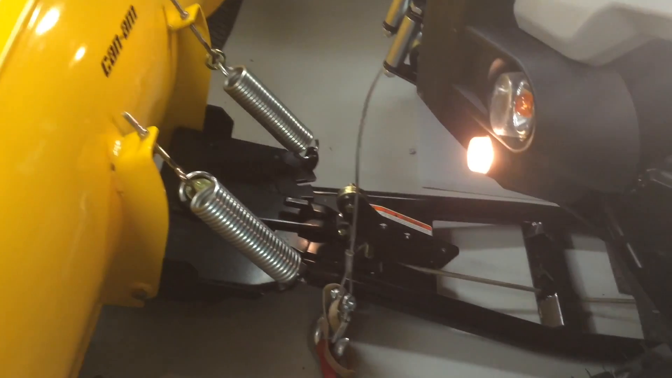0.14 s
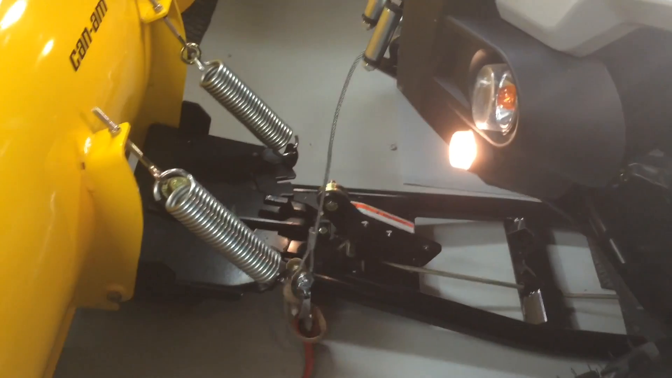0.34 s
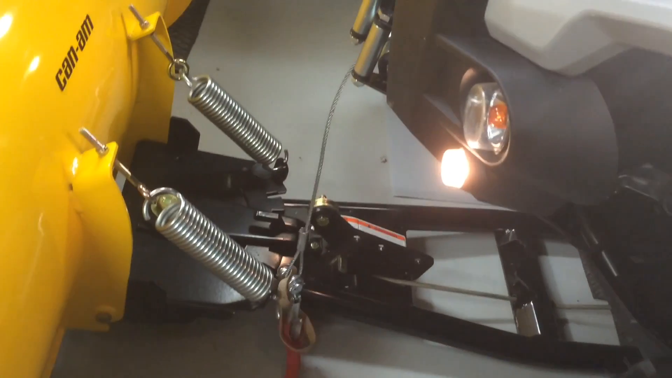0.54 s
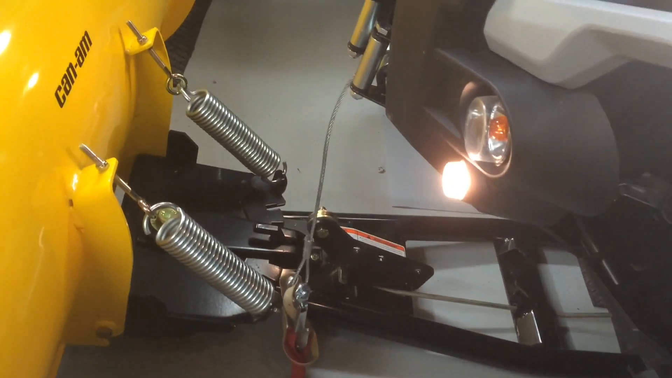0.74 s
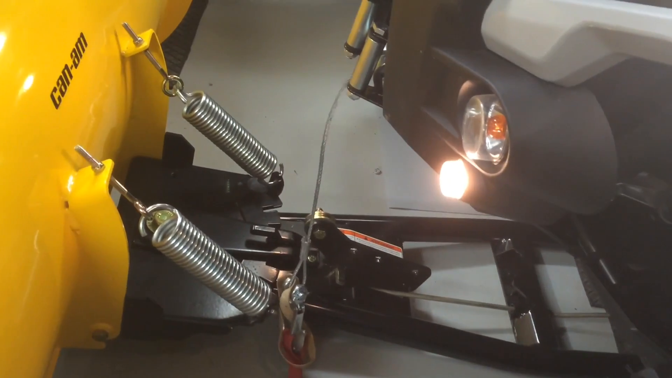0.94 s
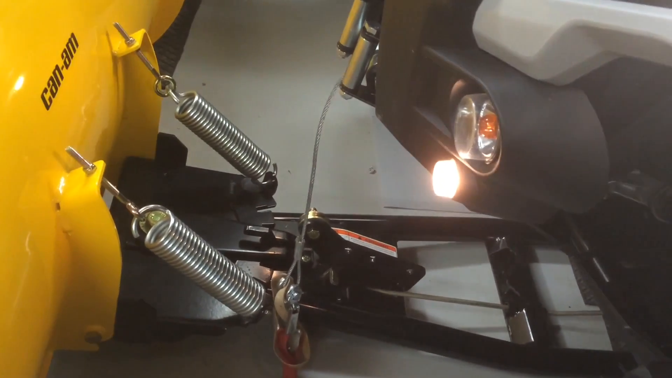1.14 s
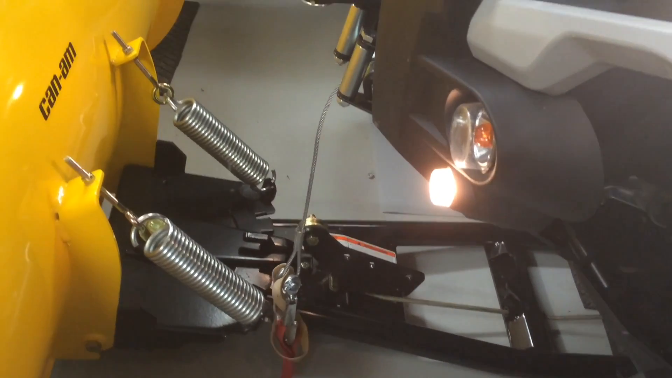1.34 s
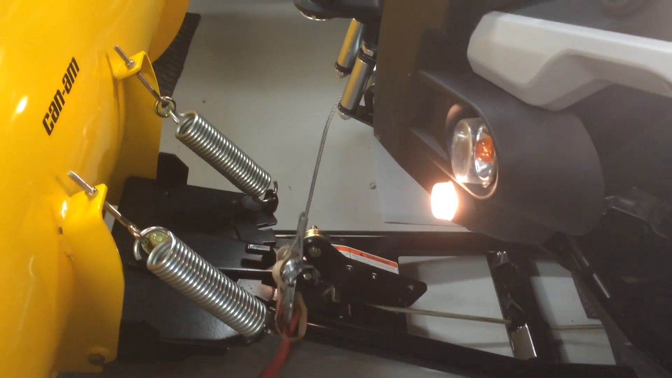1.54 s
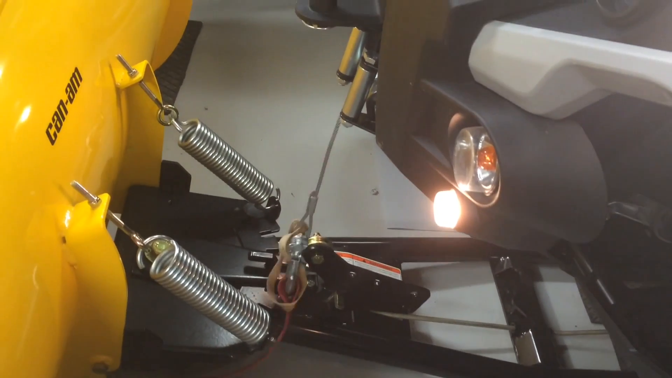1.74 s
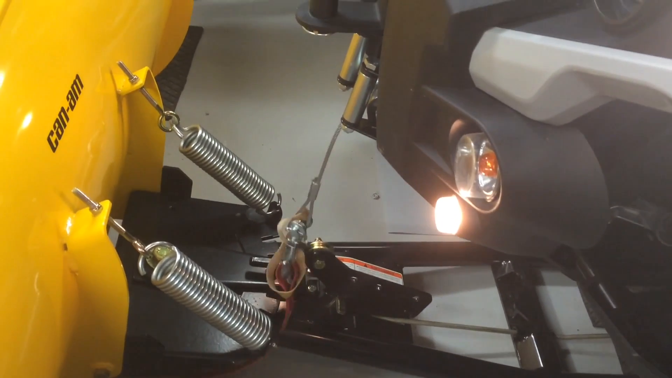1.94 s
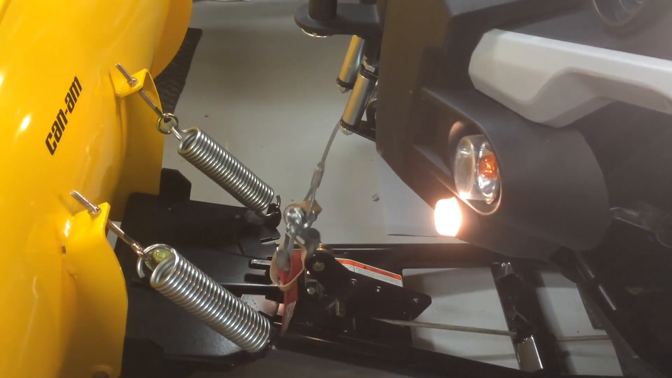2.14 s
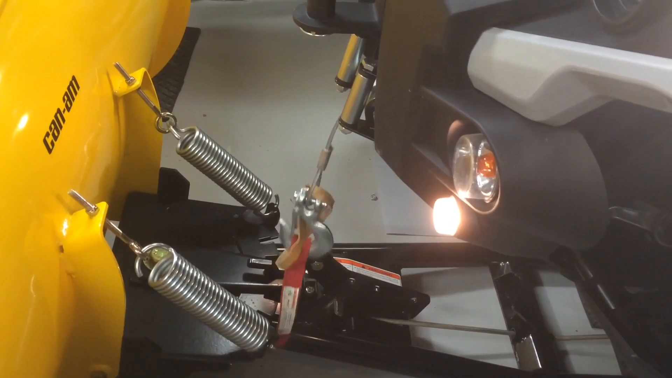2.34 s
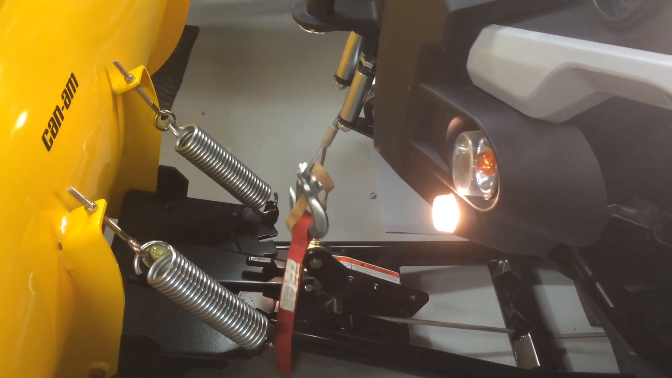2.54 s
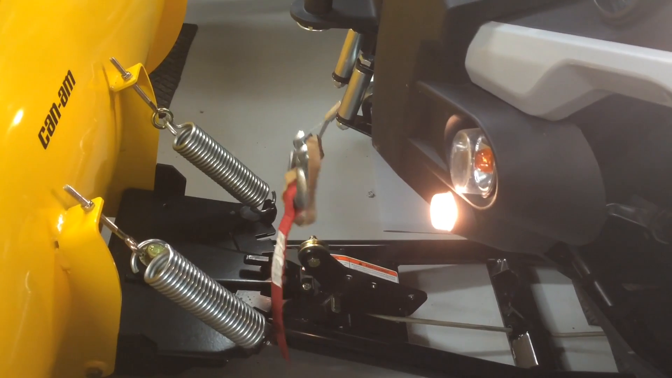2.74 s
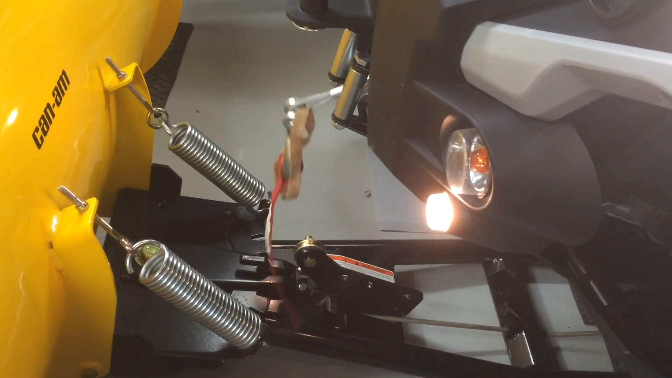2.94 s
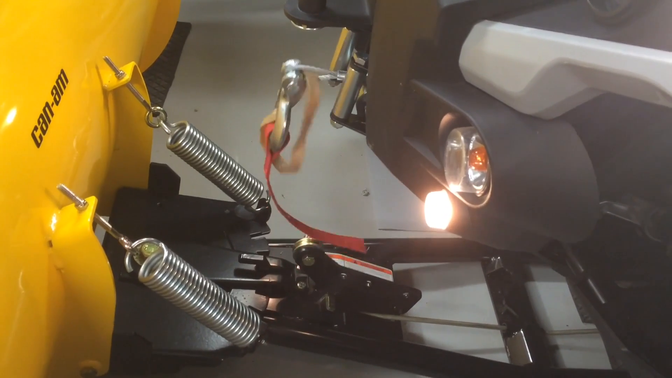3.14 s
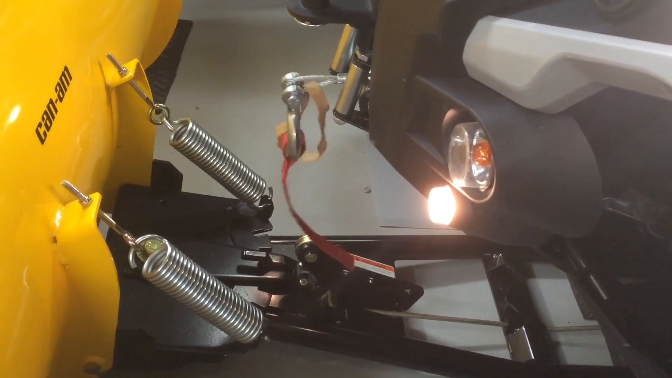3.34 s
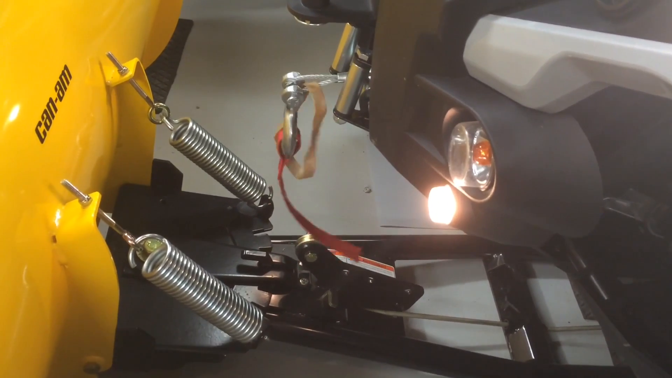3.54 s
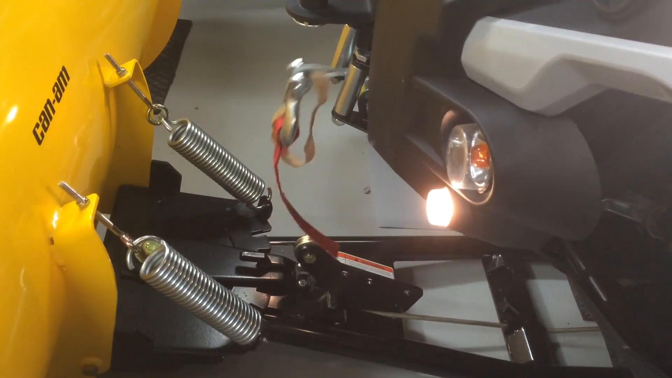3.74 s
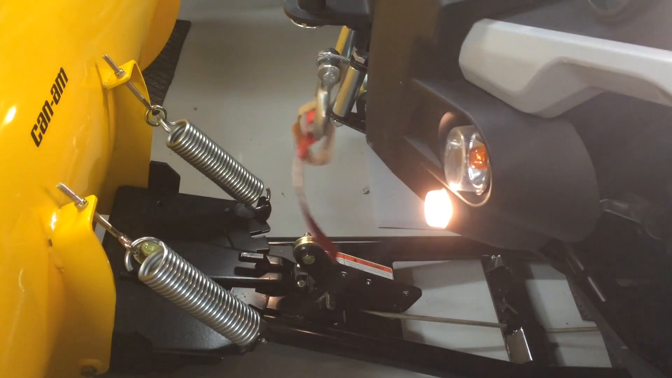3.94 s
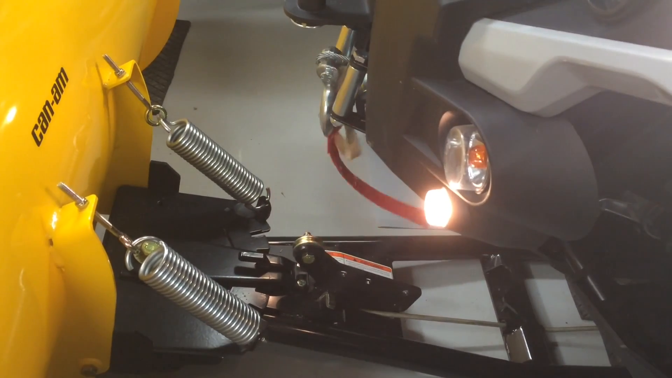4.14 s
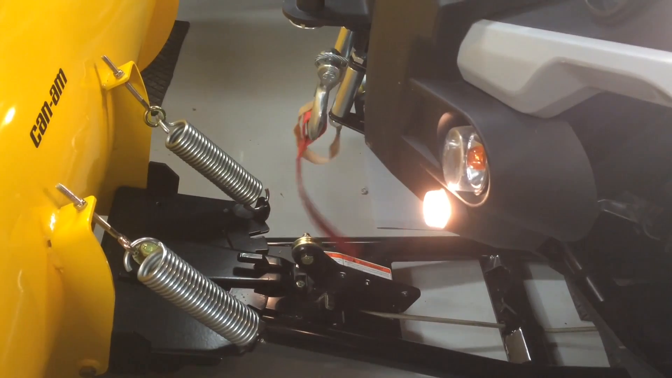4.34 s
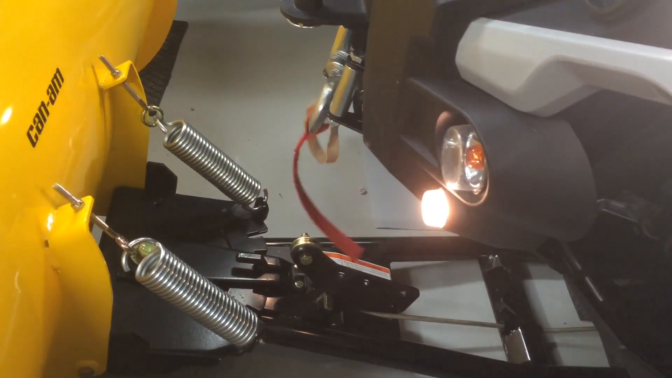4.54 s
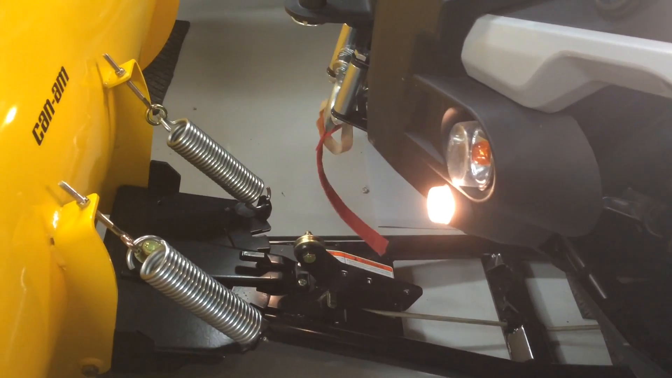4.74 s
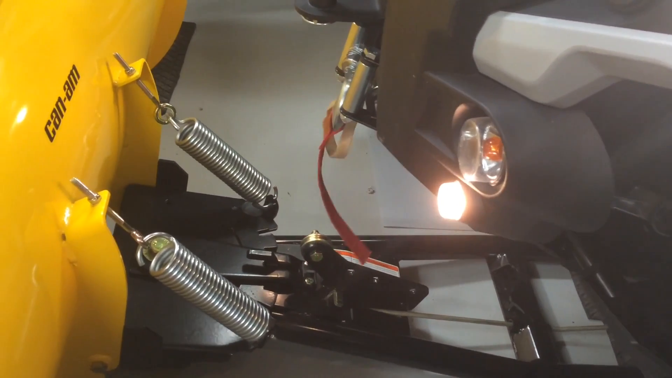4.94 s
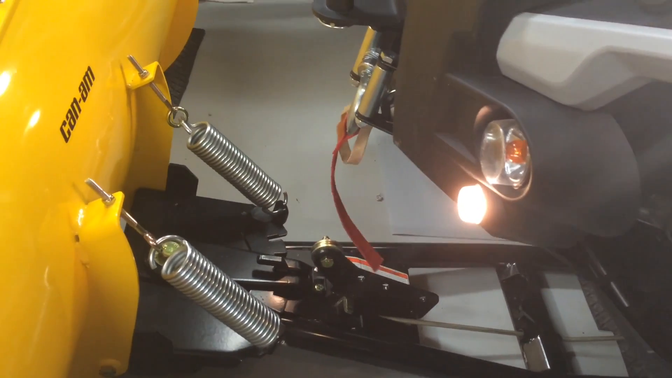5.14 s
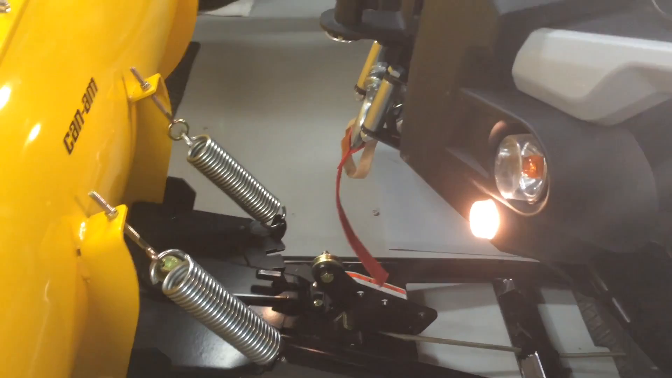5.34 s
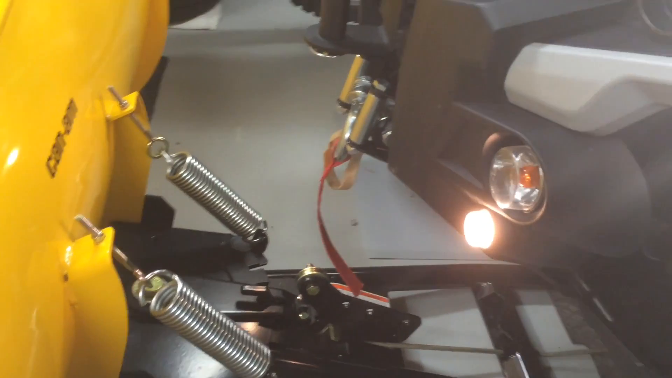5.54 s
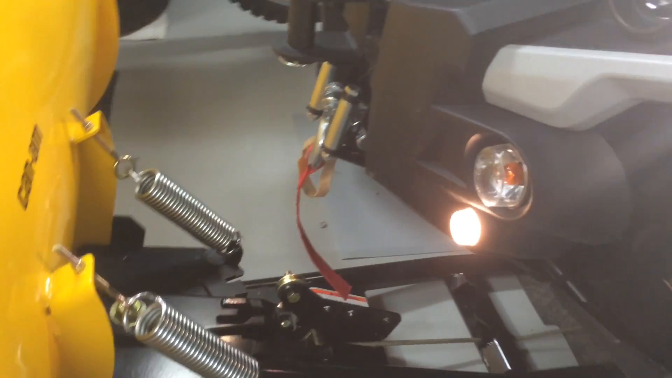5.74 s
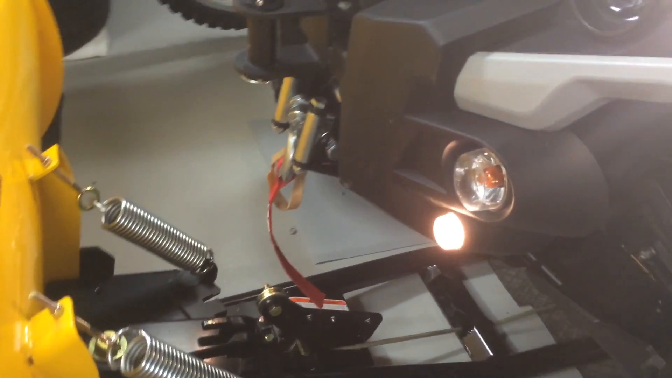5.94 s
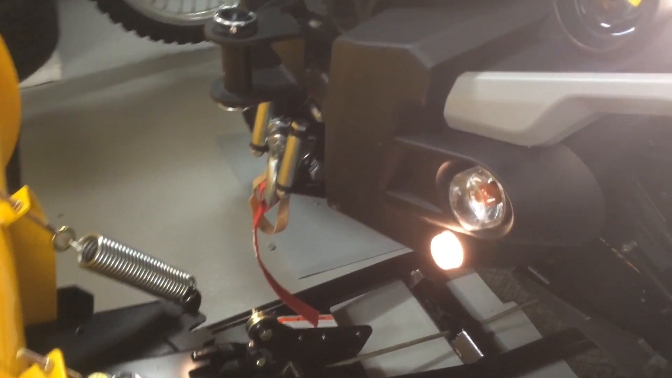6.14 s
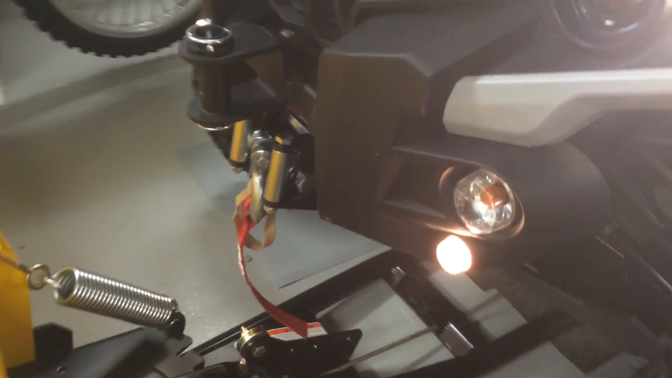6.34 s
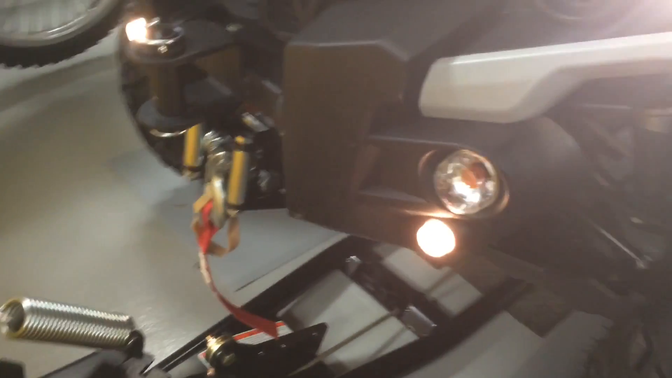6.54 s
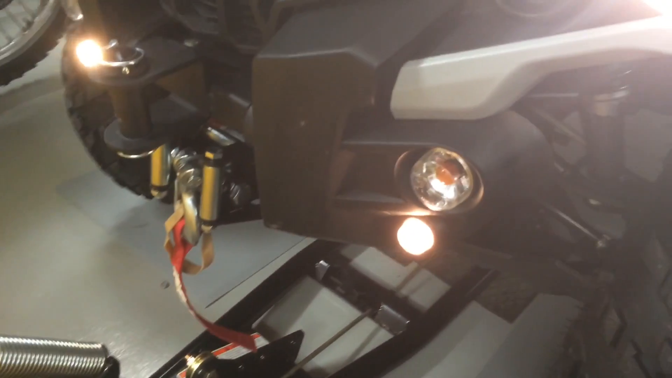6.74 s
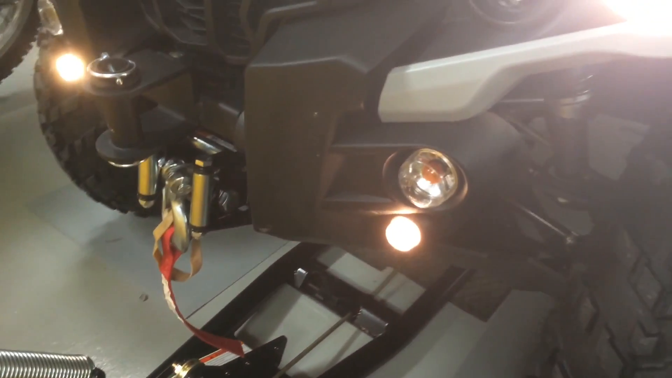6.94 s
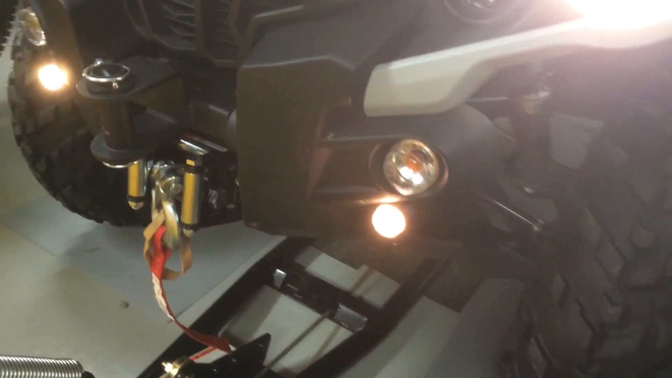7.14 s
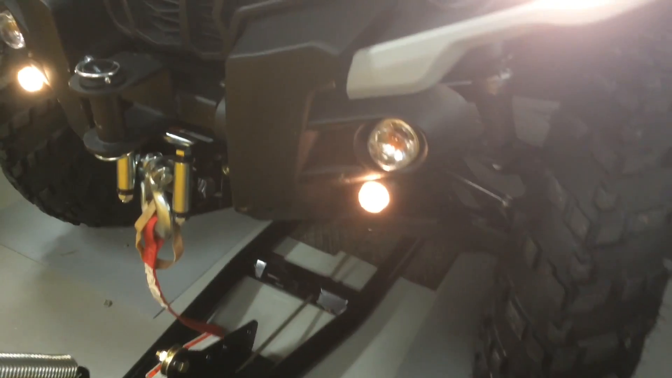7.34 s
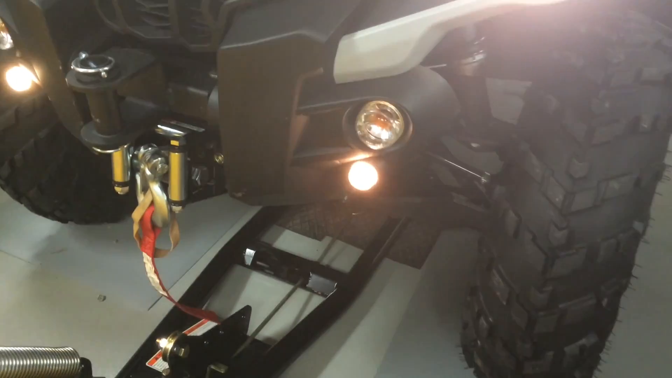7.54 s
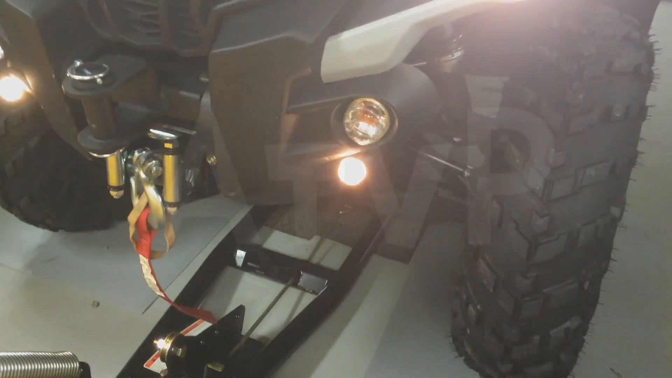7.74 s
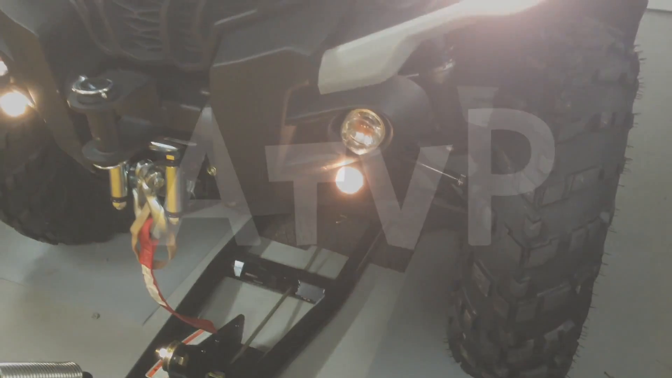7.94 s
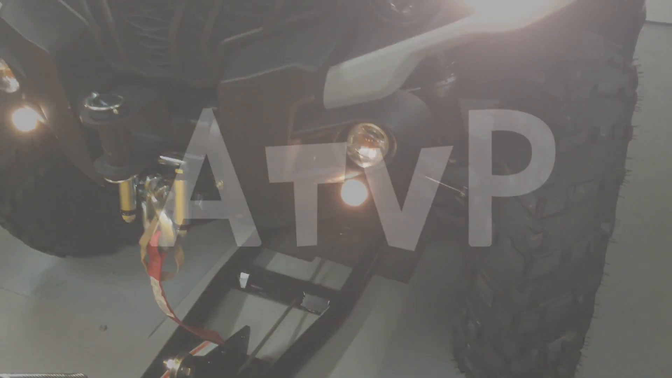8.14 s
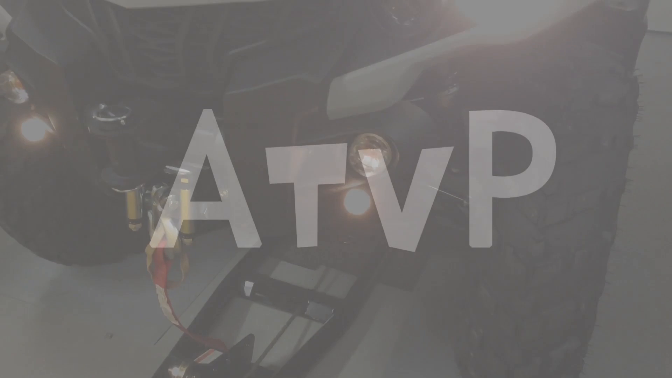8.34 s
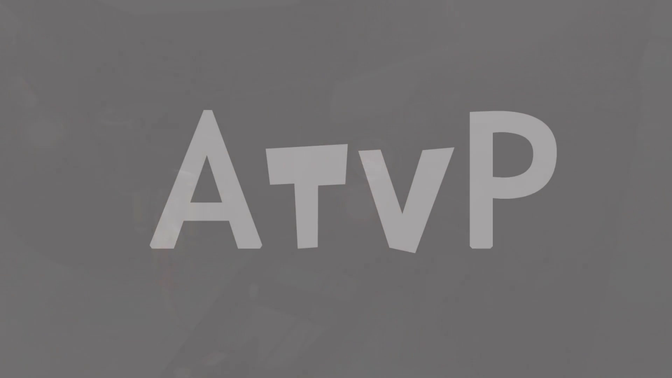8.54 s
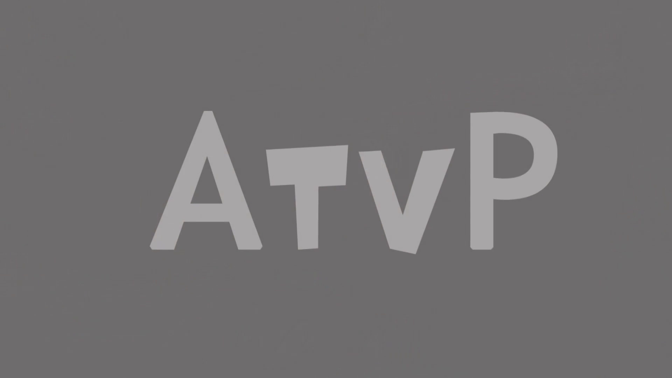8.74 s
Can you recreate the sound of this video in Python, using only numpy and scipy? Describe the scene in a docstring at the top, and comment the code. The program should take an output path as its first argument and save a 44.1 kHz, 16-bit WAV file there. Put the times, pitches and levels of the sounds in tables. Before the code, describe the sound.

Close electric winch reels in a cable in four clunking, whirring runs while a hook and steel frame knock, then quiet hum and shuffles.

```python
"""Quad winch in a garage

One microphone, close to an electric winch reeling in its cable, hook and strap in four short bursts.
Each starts and ends with a contactor snap, a clunk of the gear train and a low groan; in between the
motor whines and the gears grind. Hook and plough frame knock, and the plough springs ring on.
The room echoes briefly. Underneath lie mains hum, small ticks and a few shuffles; the end fades out."""
import sys
import numpy as np
from scipy import signal
from scipy.fft import rfft, irfft, next_fast_len
from scipy.io import wavfile
from scipy.ndimage import map_coordinates

SR = 44100
rng = np.random.default_rng(int(sys.argv[2]) if len(sys.argv) > 2 else 0)


def to_wav(sig):
    """Store sig (one row per channel, or 1-D mono) as 16-bit WAV at the path in sys.argv[1].

    Samples outside -1..1 are clipped; the rate is SR.
    """
    pcm = np.clip(np.atleast_2d(sig), -1, 1) * 32767
    pcm = np.round(pcm).astype(np.int16)
    wavfile.write(sys.argv[1], SR, pcm.T)  # frames by channels


N = 387618
TIME = np.arange(N) / SR

# Levels in the tables are relative: each source adds its own gain.
# mains hum partials: pitch_hz, level_db
HUM_PARTIALS = [(49, 0), (146.5, -5.5), (197, -5.5)]
# spectrum of the room's still air: frequency_hz, level_db
AIR_SPECTRUM = [(15, -34.5), (25, -8.5), (55, -4), (169, -17.5), (204, -15.5), (274, -24.5), (359, -22),
                (1050, -33), (15500, -45.5)]
# the contactor switches the motor: on_s, off_s, braking_clunk_db
MOTOR_RUNS = [(0.1448, .661, -13), (1.195, 3.0744, -10.5), (3.728, 3.973, -11), (4.509, 4.651, -14)]
# resonances of the contactor's case: pitch_hz, width_hz, level_db
CONTACTOR_MODES = [(1810, 780, -6), (3400, 250, -8.5), (6000, 250, -6), (7850, 330, -3.5),
                   (9100, 370, -8.5), (11600, 220, 0), (12900, 510, -3.5), (14200, 490, -6.5)]
# spectrum of the struck winch mount: frequency_hz, level_db
MOUNT_SPECTRUM = [(41, -41), (70, -11.5), (193, -4.5), (417, -12.5), (879, 0.5), (1050, -4.5), (1580, -2),
                  (2850, -10.5), (3120, -4.5), (5480, -9.5), (12100, -14.5), (15500, -22)]
# drag of the cable in the long run, steady before and after: time_s, level_db
CABLE_LOAD = [(1.36, -37.5), (1.498, -39), (1.536, -31.5), (1.866, -34), (1.884, -36), (2.294, -31),
              (2.61, -38.5), (2.778, -36.5), (3.03, -38.5)]
# whine of armature and gear mesh: {multiple of the planet carrier's rate: level_db}
WHINE_ORDERS = {8: -18, 19: -21, 20: -13, 22: -16, 24: -18, 32: -11, 40: -14, 43: -17, 45: -20, 48: -20}
# resonances of the gear housing: pitch_hz, width_hz, level_db
HOUSING_MODES = [(748, 29, -5), (1293, 10, -1.5), (1534, 70, -1.5), (2210, 38, -3.5), (3165, 67, -5.5),
                 (3585, 25, -7), (4230, 320, -15)]
# spectrum of the grinding gears: frequency_hz, level_db
GEARBOX_SPECTRUM = [(53, -46), (90, -16), (193, -2.5), (265, -15), (296, -12), (492, -21), (732, -5.5),
                    (1070, -7), (1220, -1.5), (1360, -13.5), (1490, -0.5), (2410, -14), (4000, -18),
                    (5200, -45.5), (8800, -120)]
# spectrum of brush hiss and cable rasp: frequency_hz, level_db
BRUSH_SPECTRUM = [(1410, -36.5), (2400, -3.5), (3440, -3), (3570, -6), (3830, -1.5), (4140, 0.5),
                  (5800, -2.5), (10700, -8.5), (14100, -19.5), (15500, -24.5)]
# modes of the plough's springs and blade: pitch_hz, level_db, t60_s
SPRING_MODES = [(465, -6, 1.1), (522, -8.5, 1.5), (818, -1.5, 1.3), (1174, -9, 1.7), (1420, -5.5, 1.4),
                (1750, -9.5, 1.7), (1938, -9.5, 1.5), (2090, -5, 1.8)]
# hook and plough frame knock: start_s, level_db, ring_hz, treble_db
FRAME_KNOCKS = [(.427, -0.5, 1950, 4.5), (.477, -9, 1505, 0), (.637, -6, 765.5, -16),
                (1.71, -3.5, 1090, -8.5), (1.816, -6.5, 890.7, -5), (3.103, -15.5, 615.6, -11),
                (4.039, -12, 950, -8), (4.145, -24, 1052, -3), (4.698, -9, 900, 1)]
# spectrum of the struck frame: frequency_hz, level_db
FRAME_SPECTRUM = [(53, -55), (90, -10.5), (1420, -2.5), (1720, -13.5), (2050, -2.5), (2770, -11),
                  (3820, -9.5), (4350, -19.5), (4950, -10.5), (10100, -27.5), (13600, -32), (15500, -31)]
# modes of the steel frame: pitch_hz, level_db, t60_s
FRAME_MODES = [(640, 0, 0.18), (946, -6, 0.36), (1087, -3.5, .19), (1400, -2, .24), (1597, -4, 0.15),
               (1962, 0, .25), (2100, -1, 0.32), (2510, -1, 0.27)]
# ticks of settling metal and handling: start_s, level_db
METAL_TICKS = [(1.1014, -46), (3.3172, -41.5), (4.3026, -46), (6.606, -37.5), (8.32, -49.5)]
# spectrum of shoe grit, also used for the ticks: frequency_hz, level_db
GRIT_SPECTRUM = [(180, -34), (300, -2.5), (620, -4.5), (1020, -1.5), (1750, -4.5), (2560, -11),
                 (7020, -16.5), (15500, -29)]
# footfalls: peak_s, level_db
FOOTFALLS = [(4.93, -54), (6.03, -58), (6.331, -55.5), (7.115, -59), (7.415, -39.5), (8.13, -55.5)]
# soles dragged over the floor: peak_s, level_db
SOLE_SCUFFS = [(5.48, -64), (5.87, -58.5), (6.61, -58)]
# decay of the garage's echo: frequency_hz, t60_s
GARAGE_DECAY = [(150, .5), (1000, 0.41), (4000, 0.28), (9000, 0.26), (15000, 0.24)]

TAKE_UP_S, BRAKE_S = .0125, .014  # from the snap to the clunk, on starting and on stopping


def amp(db):
    """Decibels to gain."""
    return np.exp(np.asarray(db) * (np.log(10) / 20))


def unit(x):
    """Scale to rms 1."""
    return x / np.sqrt(np.mean(x ** 2) + 1e-20)


def along(points, hz):
    """Interpolate (frequency_hz, value) points on a log axis."""
    frequencies, values = np.transpose(points)
    return np.interp(np.log(hz + 1), np.log(frequencies + 1), values)


def wobble(rate):
    """A smooth random curve, rate knots a second."""
    grid = np.arange(0, N * rate / SR + 1, 1 / 8)
    knots = rng.standard_normal(int(N * rate / SR) + 4)
    return np.interp(TIME * rate, grid, map_coordinates(knots, [grid], order=2))


def filtered(x, response):
    """Shape x by a response of frequency."""
    size = next_fast_len(len(x) + 8192)
    return irfft(rfft(x, size) * response(np.fft.rfftfreq(size, 1 / SR)), size)[:len(x)]


def noise(spectrum, size=N):
    """Coloured noise of rms 1."""
    return unit(filtered(rng.standard_normal(size), lambda hz: amp(along(spectrum, hz))))


def resonate(x, modes):
    """Pass x through a body's resonances, alternating in sign."""
    return filtered(x, lambda hz: sum(
        (-1) ** k * amp(db) * 1j * hz * width / (pitch ** 2 - hz ** 2 + 1j * hz * width)
        for k, (pitch, width, db) in enumerate(modes)))


def shelves(hz, thud_db, treble_db, thud_hz=380, treble_hz=3300):
    """Gain of a bass shelf and a treble shelf."""
    return amp(thud_db / (1 + (hz / thud_hz) ** 4) + treble_db / (1 + (treble_hz / hz.clip(1)) ** 4))


def add(track, s, sound):
    """Mix a sound in at time s."""
    part = track[max(round(s * SR), 0):][:len(sound)]
    part += sound[:len(part)]


def burst(colour, rise_s, hold_s, t60_s, treble_life=.54):
    """Parts chatter for a moment, then their dense modes die away, the highest first."""
    t = TIME[:SR // 3]
    ring = unit(filtered(rng.standard_normal(len(t)), colour))
    treble = filtered(ring, lambda hz: hz ** 2 / (hz ** 2 + 8000 ** 2))
    fall_db = -60 * np.maximum(t - hold_s, 0) / t60_s
    attack = 1 - np.exp(-t / rise_s)
    return attack * ((ring - treble) * amp(fall_db) + treble * amp(fall_db / treble_life))


def strokes(rows, rise_s, t60_s):
    """An envelope that swells to each (peak_s, level_db) and dies away."""
    return sum(np.exp(np.minimum(TIME - s, 0) / rise_s) * amp(db - 60 * np.maximum(TIME - s, 0) / t60_s)
               for s, db in rows)


def driven():
    """Stretches in which the gears are driven: start_s, stop_s."""
    return [(on + TAKE_UP_S, off + BRAKE_S) for on, off, _ in MOTOR_RUNS]


def jolts():
    """The gear train takes up its play or is braked: start_s, level_db, treble_db."""
    starts = [(on + TAKE_UP_S, -5.5, -4.5) for on, _, _ in MOTOR_RUNS]
    stops = [(off + BRAKE_S, db, -11.5) for _, off, db in MOTOR_RUNS]
    return starts + stops


def room_tone():
    """Mains hum over the still air of the garage."""
    hum = sum(amp(db + .4 * wobble(9)) * np.sin(2 * np.pi * hz * TIME + .2 * wobble(1.5))
              for hz, db in HUM_PARTIALS)
    air = filtered(noise(AIR_SPECTRUM), lambda hz: shelves(hz, -11, -3, thud_hz=80, treble_hz=2000))
    return amp(-57) * hum + amp(-55.5) * air


def contactor():
    """The plunger snaps and chatters in its small bright case, harder on closing than on opening."""
    out = np.zeros(N)
    for on, off, _ in MOTOR_RUNS:
        for s, db, top_db in [(on, -16, 2), (off, -22, -11)]:
            chatter = burst(np.ones_like, rise_s=.0012, hold_s=.0058, t60_s=.09)
            case = resonate(chatter, CONTACTOR_MODES) + .15 * chatter
            tilt = [(2000, -3.5), (4000, -.5), (8500, 0), (11500, top_db)]
            snap = filtered(case, lambda hz: amp(along(tilt, hz)))
            add(out, s, amp(db) * snap / np.std(snap[:SR // 100]))
    return out


def clunks():
    """The gear train slams against its mount; the duller the clunk, the more body it has."""
    out = np.zeros(N)
    for s, db, treble_db in jolts():
        body_db = -.7 * (treble_db + 11)
        colour = lambda hz: (amp(along(MOUNT_SPECTRUM, hz)) * shelves(hz, -14, 0, thud_hz=90)
                             * shelves(hz, body_db, treble_db + 2.5, thud_hz=810))
        slam = burst(colour, rise_s=.00041, hold_s=.0083, t60_s=.083)
        add(out, s, amp(db - 3.5 + .3 * body_db) * slam)
    return out


def groans():
    """A rough low groan sinks in pitch each time the drive is jerked into motion or braked."""
    out, t = np.zeros(N), TIME[:SR // 2]
    envelope = (1 - np.exp(-t / .008)) * np.exp(-(t / .1) ** 3)
    for on, off in driven():
        for s, db, pitch_hz, sink_s in [(on, -29, 220, .17), (off, -33.5, 215, .39)]:
            phase = 2 * np.pi * np.cumsum(pitch_hz * np.exp(-t / sink_s)) / SR
            judder = noise([(15, -.5), (40, 0), (110, -51)], size=len(t))
            groan = np.sin(phase + 2.2 * judder) + .25 * np.sin(2 * phase + 3 * judder)
            add(out, s, amp(db) * groan * envelope)
    return out


def cable_rasp(slips_per_s=45, scrape_s=.0096):
    """Strands slip over one another on the drum in short uneven scrapes."""
    slips = (rng.random(N) < slips_per_s / SR) * rng.uniform(0, 1, N) ** 2
    scrapes = signal.lfilter([1], [1, -np.exp(-1 / (scrape_s * SR))], slips)
    return amp(-10.5) * unit(scrapes * noise(BRUSH_SPECTRUM))


def winch(full_speed_hz=151.65, spin_up_s=.015, coast_s=.017, teeth=8):
    """Teeth rattle the housing, brushes hiss and the shaft orders sing: returns grind and whine."""
    load = amp(np.interp(TIME, *np.transpose(CABLE_LOAD)) + 8.5)
    power = sum((1 - np.exp(-np.maximum(TIME - on, 0) / spin_up_s))
                * np.exp(-np.maximum(TIME - off, 0) / coast_s) for on, off in driven())
    shaft_hz = full_speed_hz * (1 + .0005 * wobble(14)) * (1 - .1 * (1 - power))
    shaft = 2 * np.pi * np.cumsum(shaft_hz) / SR
    carrier = shaft / 4
    second_stage = carrier / 3
    # the gears bind a little once in each turn of their carriers
    bind = amp(.88 * np.sin(carrier + 1.8 * wobble(9.4)) + 1.3 * np.sin(second_stage + wobble(4))
               + .6 * np.sin(shaft) + .88 * wobble(30))
    tones = sum(amp(db + 2.5 * wobble(8)) * np.sin(order * carrier + .22 * wobble(22))
                for order, db in WHINE_ORDERS.items())
    commutator = amp(-41 + 1.5 * wobble(8)) * np.sin(24 * shaft)
    # one blow of uneven size for each tooth that meshes
    tooth_blows = np.diff(np.floor(teeth * shaft / (2 * np.pi)), prepend=0) * rng.standard_normal(N)
    rattle = amp(-7) * unit(resonate(tooth_blows, HOUSING_MODES))
    gearbox = amp(-3.5) * filtered(noise(GEARBOX_SPECTRUM), lambda hz: shelves(hz, -2, 0))
    brushes = amp(-8.5 + 1.4 * wobble(500)) * noise(BRUSH_SPECTRUM)
    grind = power * load * (bind * (rattle + gearbox + brushes) + cable_rasp())
    whine = power * (amp(.5) * load * tones + commutator)
    return grind, whine


def springs(slack_s=2, slack_db_per_s=-11, coil_t60_s=1.15, coil_count=220):
    """Blows set the plough's springs and blade ringing, ever less once the cable goes slack."""
    out, t = np.zeros(N), TIME[:2 * SR]
    modes = np.array([amp(db) * np.exp((2j * np.pi * hz - np.log(1000) / t60) * t)
                      for hz, db, t60 in SPRING_MODES])
    # a thicket of weak coil modes lies among the strong ones
    coil_bins = (450 * 2 ** rng.uniform(0, 2.5, coil_count) * len(t) / SR).astype(int)
    coil_decay = amp(-60 * t / coil_t60_s)
    for s, db, *_ in list(FRAME_KNOCKS) + jolts():
        coils = np.zeros(len(t) // 2 + 1, complex)
        coils[coil_bins] = np.exp(2j * np.pi * rng.random(coil_count))
        phases = np.exp(2j * np.pi * rng.random(len(modes)))
        ring = (phases @ modes).real + coil_decay * unit(irfft(coils))
        slack_db = slack_db_per_s * max(s - slack_s, 0)
        add(out, s, amp(db - 31.5 + slack_db) * ring * (1 - np.exp(-t / .004)))
    return out * amp(3.2 * wobble(20))  # the springs sway, so their ring wavers


def knocks():
    """Each knock of hook and steel frame favours the modes near its own ring pitch."""
    out, t = np.zeros(N), TIME[:SR // 2]
    for s, db, ring_hz, treble_db in FRAME_KNOCKS:
        thud_db = -3 - 5 * np.log2(ring_hz / 1000)  # harder knocks ring higher and thud less
        near = lambda hz: np.exp(-(np.log2(np.maximum(hz, 1) / ring_hz) / .6) ** 2)
        colour = lambda hz: (amp(along(FRAME_SPECTRUM, hz) + 5.4 * near(hz))
                             * shelves(hz, thud_db, treble_db, thud_hz=300))
        crash = burst(colour, rise_s=.0006, hold_s=.006, t60_s=.12)
        clank = sum(amp(mode_db + rng.normal(0, 2) - 11 * (1 - near(hz)) - 60 * t / t60)
                    * np.sin(2 * np.pi * hz * t + rng.uniform(0, 2 * np.pi))
                    for hz, mode_db, t60 in FRAME_MODES)
        add(out, s, amp(db - 9.5) * crash)
        add(out, s, amp(db - 17.5) * clank * (1 - np.exp(-t / .001)))
    return out


def ticks():
    """Metal gives tiny clicks as it settles or is handled."""
    out = np.zeros(N)
    colour = lambda hz: amp(along(GRIT_SPECTRUM, hz) / 2)
    for s, db in METAL_TICKS:
        add(out, s, amp(db - 9.5) * burst(colour, rise_s=.0005, hold_s=.0022, t60_s=.096))
    return out


def shuffles():
    """Soles land on the concrete with a soft thud, or scuff along it."""
    grit = noise(GRIT_SPECTRUM) * amp(2.3 * wobble(250))
    thud = amp(4.5) * noise([(70, -32), (150, 3), (230, 2.5), (400, -16), (1200, -50.5)])
    scrape = filtered(grit, lambda hz: shelves(hz, thud_db=-8, treble_db=8.5))
    steps = strokes(FOOTFALLS, rise_s=.0051, t60_s=.24) * (grit + thud)
    scuffs = strokes(SOLE_SCUFFS, rise_s=.06, t60_s=.37) * scrape
    return steps + scuffs


def garage(x):
    """What the walls send back to the microphone: a short tail whose treble dies first."""
    hz, t, spectra = signal.stft(rng.standard_normal(SR * 3 // 4), SR, nperseg=256)
    decay = amp(-60 * t / along(GARAGE_DECAY, hz)[:, None])
    _, tail = signal.istft(spectra * decay, SR, nperseg=256)
    tail *= 1 - np.exp(-TIME[:len(tail)] / .0062)
    return signal.fftconvolve(x, tail / np.linalg.norm(tail))[:N]


def scene():
    """The garage in mono from beside the winch, the direct sound well above the echo."""
    blows = contactor() + clunks() + knocks() + ticks()
    grind, whine = winch()
    friction = grind + shuffles()
    echo = amp(-8) * garage(blows + friction)
    return (blows + amp(-.5) * friction + whine + groans() + echo + springs() + room_tone())[None]


def record(dry):
    """After the microphone: peaks are rounded off, the end fades out and the top treble is cut."""
    fade_span_s, top_hz = (7.52, 8.675), 15600
    rounded = dry[0] / (1 + np.abs(dry[0]) ** 6) ** (1 / 6)
    fade = np.interp(TIME, fade_span_s, [1, 0])
    return filtered(rounded * fade, lambda hz: 1 / (1 + (hz / top_hz) ** 160))[None]


dry = scene()
out = record(dry)
to_wav(out)
```